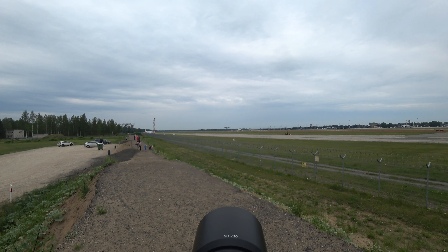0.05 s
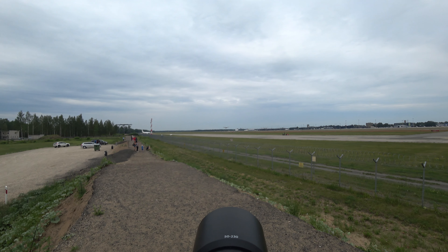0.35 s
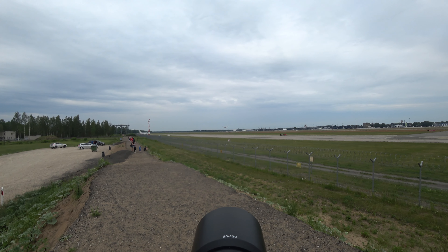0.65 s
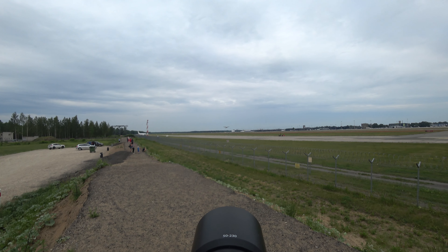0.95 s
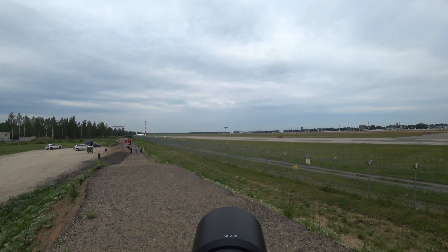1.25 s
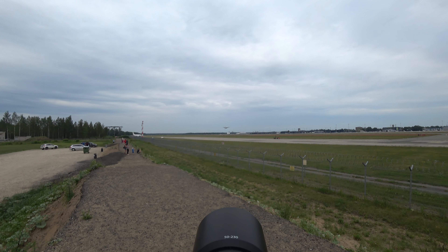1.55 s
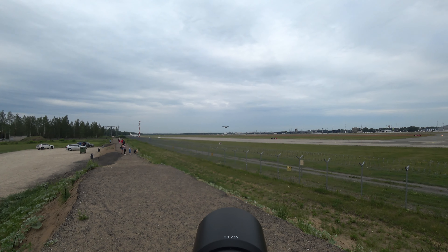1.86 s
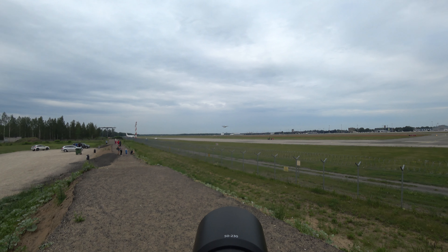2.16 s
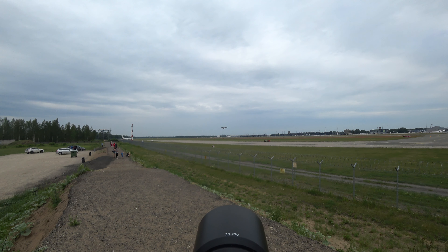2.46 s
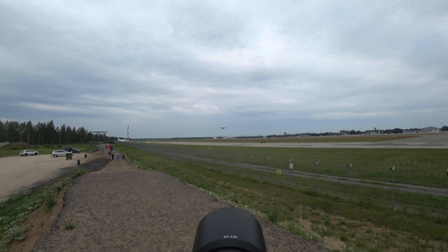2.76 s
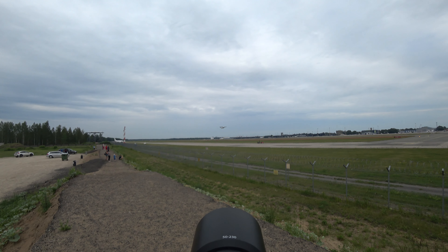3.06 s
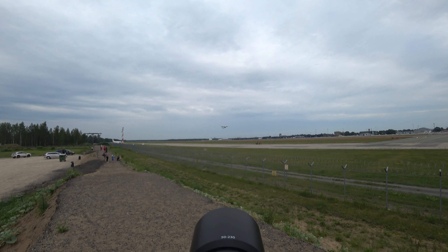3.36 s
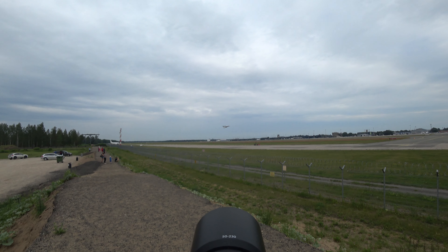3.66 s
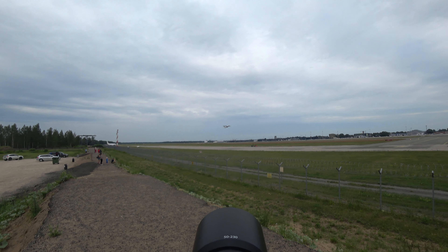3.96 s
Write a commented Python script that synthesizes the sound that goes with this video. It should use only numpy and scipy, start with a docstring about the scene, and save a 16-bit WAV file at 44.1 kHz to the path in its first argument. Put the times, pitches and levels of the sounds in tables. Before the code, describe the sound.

Close, steady camera shutter bursts outdoors while a faraway jet rumble slowly swells.

```python
"""A single-lens reflex camera whirrs and clicks close by, about four frames a second, beside a runway.
In each frame a motor lifts the mirror, the mirror slaps up, two shutter curtains snap, and the
motor winds on until a latch catches. Blows and gears make the camera body ring.
Behind it a distant jet swells, wind rumbles on the microphone, a bird chirps and the air hisses."""
import sys
import numpy as np
from scipy import signal
from scipy.fft import rfft, irfft
from scipy.io import wavfile
from scipy.ndimage import uniform_filter1d

SR = 44100
rng = np.random.default_rng(int(sys.argv[2]) if len(sys.argv) > 2 else 0)


def dump_mix(stems):
    """Bounce the given channels to the path in sys.argv[1] as a 16-bit WAV at rate SR."""
    frames = np.atleast_2d(stems).T  # one column per channel
    limited = np.clip(frames, -1, 1)  # hard clip at full scale
    pcm = np.round(limited * 32767).astype(np.int16)
    wavfile.write(sys.argv[1], SR, pcm)


N = 176400

# Camera frames: mirror up t/s, shutter opens t/s, shutter closes t/s
FRAMES = [(0.124, 0.139, 0.1586), (0.3457, 0.358, 0.3777), (0.6078, 0.6224, 0.6418),
          (0.837, 0.8468, 0.8652), (1.0875, 1.094, 1.1172), (1.3347, 1.349, 1.3682),
          (1.5883, 1.6013, 1.6204), (1.8059, 1.813, 1.8327), (2.063, 2.0703, 2.0892),
          (2.2747, 2.2892, 2.308), (2.5024, 2.509, 2.5308), (2.726, 2.7362, 2.7549), (2.946, 2.953, 2.9749),
          (3.1998, 3.21, 3.2286), (3.4507, 3.458, 3.4788), (3.669, 3.6827, 3.7015), (3.92, 3.9347, 3.9533)]
# Pitches the body rings at: f/Hz, width/Hz, left minus right/dB,
# then level/dB when shaken by mirror, opening curtain, closing curtain, latch, motor
BODY_MODES = [(221, 59, 5.5, 17, 17, 23, -2, 10.5), (549.4, 76, 2.5, 20, 23, 11, -2, 14.5),
              (710, 576, -8, 14, 12, 10.5, -2.5, 5.5), (1300, 430, -4, 5, 3, 2.5, -0.5, -21),
              (1890, 356, -3.5, 3.5, 4, 3, 7, -3), (2494, 360, -0.5, 3, 4, 6.5, 3, -6.5),
              (3000, 320, 4.5, 7.5, 10, 0.5, 7.5, -2), (3618, 456, 4, 0, 14.5, 7.5, 10.5, 5.5),
              (4160, 450, -4, -8, 12, 7.5, 11.5, 6.5), (4706, 694, 0.5, 12, 14, 15.5, 21, 8.5),
              (5385, 540, -1, 9.5, 12.5, 15.5, -12, 1), (5768, 585, 7.5, 13.5, 13.5, 15.5, 13.5, 6.5),
              (7453, 1120, 0.5, 3, 1.5, 3.5, 3, -5.5), (9835, 1350, 6, -12, 6, -3.5, -8, -14),
              (12550, 2660, 1.5, -9, 3.5, -2.5, -8.5, -15.5), (15400, 1200, 0, -20, -6, -11, -19, -41)]
# Blows of mirror, opening curtain, closing curtain, latch: chatter/s, its decay/s, rattle decay/s
BLOWS = [(0.0022, 0.0017, 0.0079), (0.00237, 0.00086, 0.0057), (.0022, 0.0018, 0.01),
         (0.00194, 0.00075, 0.0017)]
# How far the left channel runs ahead of the right: f/Hz, phase/rad
LEFT_LEAD = [(3450, 0.3548), (4220, 2), (5300, 0.88), (10200, .8), (11300, 0.5)]
# The jet's swell: t/s, drone level/dB, roar level/dB, hiss level/dB
JET_SWELL = [(0, -46.5, -50.5, -71), (.6, -44, -51, -59), (1.48, -43, -42, -51.5), (2, -40.5, -39, -43.5),
             (2.65, -38, -34.5, -43), (3.55, -39.5, -36, -47.5), (4, -34, -29.5, -38.5)]
# Engine tones: f/Hz, level/dB against the drone noise
DRONE_TONES = [(81, -3), (144, -.5)]
# Wind gusts: t/s, level/dB
GUSTS = [(.25, -46), (.46, -34), (.62, -42), (1.1, -39), (2.5, -40.5), (3.55, -37.5), (3.86, -26.5),
         (4, -30.5)]
# Bird calls: t/s, starting f/Hz, level/dB
CHIRPS = [(0.534, 4350, -54), (1.51, 7200, -61), (1.71, 7200, -61)]
# Noise colours of the jet's three layers, the wind and the air: f/Hz, relative level/dB
DRONE_COLOUR = [(55, -10), (100, -2.5), (205, -2.5), (330, -16.5)]
ROAR_COLOUR = [(170, -10), (280, 0.5), (1230, 0), (1400, -9.5), (2600, -20)]
HISS_COLOUR = [(900, -15), (1800, 1.5), (2130, -10), (2400, 0), (3400, -4.5), (4500, -16), (7000, -32)]
WIND_COLOUR = [(10, -30), (25, -3), (90, -1.5), (250, -15), (600, -33.5)]
AIR_COLOUR = [(4500, 0), (8500, -19), (11500, -15.5), (16000, -22)]

MIRROR, OPENING, CLOSING, LATCH, MOTOR = range(5)
SIZE = 4096  # samples in one short camera sound
SHORT_T, SHORT_HZ = np.arange(SIZE) / SR, np.fft.rfftfreq(SIZE, 1 / SR)
LIFT_S, WIND_ON_S, SPIN_UP_S, COAST_S = .028, .032, .0023, .0043  # motor timing
LOOSE_S = .017  # how long loose parts tick


def camera():
    """Every frame plays the same chain of motor runs and blows."""
    out, t = np.zeros((2, N)), SHORT_T
    motor_ring = body_ring(MOTOR)
    mirror, opening, closing, latch = [striker(part) for part in (MIRROR, OPENING, CLOSING, LATCH)]
    blade_ring = body_ring(OPENING)
    lift = amp(-29 + 12 * np.minimum(t / LIFT_S - 1, 0)) * hold_then_fade(LIFT_S, COAST_S)
    run = (1 - np.exp(-t / SPIN_UP_S)) * hold_then_fade(WIND_ON_S, COAST_S)
    for up, opens, closes in FRAMES:
        add(out, up - .0285, amp(-23.5) * mirror())  # the catch lets go
        add(out, up - LIFT_S, gears(lift, motor_ring))
        add(out, up - LOOSE_S, loose_parts(blade_ring))
        add(out, up, mirror())
        add(out, opens, opening())
        add(out, closes - .0054, amp(-8) * closing())  # the curtain is freed
        add(out, closes, closing())
        add(out, closes, loose_parts(blade_ring))
        latched = closes + .0601
        add(out, latched - WIND_ON_S, amp(-32) * gears(run, motor_ring))
        add(out, latched - WIND_ON_S, amp(-39) * motor_whine(run))
        add(out, latched, latch())
        add(out, latched, .5 * loose_parts(blade_ring))
        add(out, latched + .0069, amp(-17.5) * latch())  # the latch bounces
    return out


def striker(part, variety=.65, treble_hz=8000, crack_spread_db=3):
    """A moving part hits the body. Returns a function that plays one blow, never quite the same."""
    hold_s, decay_s, rattle_s = BLOWS[part]
    contact = hold_then_fade(hold_s, decay_s)
    envelope = contact + amp(-18.5) * np.exp(-SHORT_T / rattle_s)
    snap = np.exp(-SHORT_T / .0005) + amp(-7) * contact
    low_share = 1 / (1 + (SHORT_HZ / treble_hz) ** 10)
    grain = rng.standard_normal((1, SIZE))  # shared by all blows of this part
    side_grain = .66 * rng.standard_normal((2, SIZE))  # left and right differ a little
    ring = body_ring(part)

    def blow():
        noise = grain + variety * rng.standard_normal(SIZE)
        crack_gain = amp(crack_spread_db * (2 * rng.random() - 1))
        crack = crack_gain * chatter(noise + rng.standard_normal(SIZE), snap)
        clack = chatter(noise + side_grain, envelope)
        force = irfft(low_share * clack + (1 - low_share) * crack)
        return signal.fftconvolve(force[:, :SIZE // 2], ring, axes=1)
    return blow


def chatter(noise, envelope):
    """The spectrum of a flurry of tiny contacts, about equally strong at every pitch."""
    x = noise * envelope
    for _ in range(2):  # flatten the colour, then restore the shape in time
        spectrum = rfft(x)
        x = irfft(spectrum / (abs(spectrum) + 1e-9))
        x *= envelope / np.sqrt(abs(uniform_filter1d(x ** 2, size=60)) + 1e-12)
    return rfft(x) / np.linalg.norm(x, axis=1, keepdims=True)


def body_ring(part):
    """How the camera body rings, in stereo, after one tap from the given part."""
    modes = np.array(BODY_MODES, float)
    centre_hz, width_hz, balance_db, level_db = modes[:, :1], modes[:, 1:2], modes[:, 2], modes[:, 3 + part]
    peaks = 1 / (1 + (2 * (SHORT_HZ - centre_hz) / width_hz) ** 2) ** 2
    sides = np.array([[.5], [-.5]])
    power = amp(level_db + sides * balance_db) ** 2 @ peaks
    log_gain = np.log(power + 1e-7) / 2
    # Minimum phase makes the ringing follow the tap.
    cepstrum = irfft(log_gain.mean(0))
    phase = 2 * rfft(cepstrum * (np.arange(SIZE) < SIZE // 2)).imag
    ring = irfft(np.exp(log_gain + 1j * (phase + sides * curve_at(LEFT_LEAD, SHORT_HZ))))
    return np.roll(ring, 10, 1)[:, :SIZE * 3 // 4]


def gears(envelope, ring, teeth_per_s=570, depth=.52, grit=1.5):
    """Gear teeth scrape in quick, gritty pulses and shake the body."""
    teeth = np.cumsum(teeth_per_s * (1 + wobble(SIZE, 50))) / SR
    pulses = 1 + depth * np.cos(2 * np.pi * teeth)
    noise = rng.standard_normal(SIZE)
    scrape = unit_rms(pulses * np.sign(noise) * abs(noise) ** grit)  # grit above 1 breaks it into ticks
    return signal.fftconvolve((scrape * envelope)[None], ring, axes=1)


def motor_whine(envelope, start_hz=3550, rise_hz_per_s=30000):
    """The motor's whine climbs as it winds on."""
    hz = start_hz + rise_hz_per_s * np.minimum(SHORT_T, WIND_ON_S) + 900 * wobble(SIZE, 40)
    return (envelope * np.sin(2 * np.pi * np.cumsum(hz) / SR))[None]


def loose_parts(ring, ticks_per_s=330):
    """Small loose parts give a handful of bright ticks at random moments."""
    hits = (rng.random(SIZE) < ticks_per_s / SR) & (SHORT_T < LOOSE_S)
    ticks = hits * rng.uniform(-.86, 1, SIZE)
    return amp(-27) * signal.fftconvolve(np.diff(ticks)[None], ring, axes=1)


def ground_echo(sound, dull_hz=6500, decay_s=.008, delay_s=.006):
    """The ground scatters back a short, weak, dull echo."""
    t = np.arange(2 * SIZE) / SR
    tail = rng.standard_normal((2, len(t))) * np.exp(-t / decay_s) * (t > delay_s)
    tail = signal.sosfilt(signal.butter(4, dull_hz, fs=SR, output="sos"), tail / np.linalg.norm(tail[0]))
    return amp(-21) * signal.fftconvolve(sound, tail, axes=1)[:, :N]


def jet():
    """A distant jet's drone, roar and hiss swell, fading in patches as the air moves."""
    times, *levels = np.transpose(JET_SWELL)
    drone_gain, roar_gain, hiss_gain = [amp(np.interp(np.arange(N) / SR, times, db)) for db in levels]
    far = dict(likeness=.89, left_db=-1.5, patchy_db=2.5)
    drone = airy_noise(DRONE_COLOUR, **far)
    drone += sum(engine_tone(hz, width_hz=10.2, db=db) for hz, db in DRONE_TONES)
    roar = airy_noise(ROAR_COLOUR, **far) + engine_tone(1231, width_hz=32, db=-14)
    return drone_gain * drone + roar_gain * roar + hiss_gain * airy_noise(HISS_COLOUR, **far)


def engine_tone(hz, width_hz, db):
    """One wavering tone of the jet's engines."""
    t, offset_hz = np.arange(N) / SR, np.fft.fftfreq(N, 1 / SR)
    waver = np.fft.ifft(np.exp(2j * np.pi * rng.random(N) - (offset_hz / width_hz) ** 2))
    return amp(db) * unit_rms((waver * np.exp(2j * np.pi * hz * t)).real)


def wind():
    """Gusts puff on the microphone and make it rumble."""
    gain = amp(np.interp(np.arange(N) / SR, *np.transpose(GUSTS)))
    return gain * airy_noise(WIND_COLOUR, likeness=.82, left_db=-2.8, patchy_db=3)


def bird(length_s=.061, fall=.21):
    """Thin, falling whistles far away, each with a fainter tone a fifth above."""
    out, progress = np.zeros((2, N)), np.arange(0, 1, 1 / (length_s * SR))
    for start_s, start_hz, db in CHIRPS:
        hz = start_hz * (1 - fall * progress + .1 * wobble(len(progress), 100))
        phase = 2 * np.pi * np.cumsum(hz) / SR
        whistle = np.sin(phase) + .5 * np.sin(1.5 * phase)
        add(out, start_s, amp(db) * (np.sin(np.pi * progress) * whistle)[None])
    return out


def still_air():
    """The smooth, faint hiss of the open field."""
    return amp(-55.5) * airy_noise(AIR_COLOUR, likeness=.6, left_db=0, patchy_db=1)


def airy_noise(colour, likeness, left_db, patchy_db):
    """Stereo noise that fades in patches; likeness (0 to 1) says how alike the two sides are."""
    slices, hz = N // 512 + 5, np.fft.rfftfreq(2048, 1 / SR)
    a, b, c, d, patches = rng.standard_normal((slices, len(hz), 5)).T
    patches = uniform_filter1d(patches, size=8, axis=0)  # smooth across pitch
    patches = unit_rms(uniform_filter1d(patches, size=9, axis=1))  # and across time
    left = a + 1j * b
    right = likeness * left + np.sqrt(1 - likeness ** 2) * (c + 1j * d)
    spectra = np.array([left, right]) * amp(curve_at(colour, hz)[:, None] + patchy_db * patches)
    top_hz = 1.15 * colour[-1][0]
    spectra /= np.sqrt(1 + (hz[:, None] / top_hz) ** 10)
    noise = signal.istft(spectra, nperseg=2048, noverlap=1536)[1][:, :N]
    return unit_rms(noise) * amp([[left_db / 2], [-left_db / 2]])


def hold_then_fade(hold_s, decay_s):
    """A gain that stays at 1, then dies away."""
    return np.exp(-np.maximum(SHORT_T - hold_s, 0) / decay_s)


def wobble(samples, smoothing):
    """A small random drift around zero."""
    return uniform_filter1d(rng.standard_normal(samples), size=smoothing)


def amp(db):
    """Turns decibels into gain."""
    return 10 ** (np.asarray(db) / 20)


def unit_rms(x):
    """Scales a sound to an average power of 1."""
    return x / np.sqrt(np.mean(x ** 2) + 1e-20)


def curve_at(points, hz):
    """Reads between a table's rows on a log-frequency axis."""
    f, value = np.transpose(points)
    return np.interp(np.log(hz + 1), np.log(f), value)


def add(mix, start_s, sound):
    """Mixes a sound in at the given time."""
    part = mix[:, max(round(start_s * SR), 0):][:, :sound.shape[1]]
    part += sound[:, :part.shape[1]]


def scene():
    """The close camera over the open airfield."""
    clicks = camera()
    return clicks + ground_echo(clicks) + jet() + wind() + still_air() + bird()


def record(dry):
    """Cuts off the highest treble, above 16300 Hz."""
    lowpass = signal.firwin(255, 16300, window=("kaiser", 9), fs=SR)
    return signal.oaconvolve(dry, lowpass[None], "same")


dry = scene()
out = record(dry)
dump_mix(out)
```